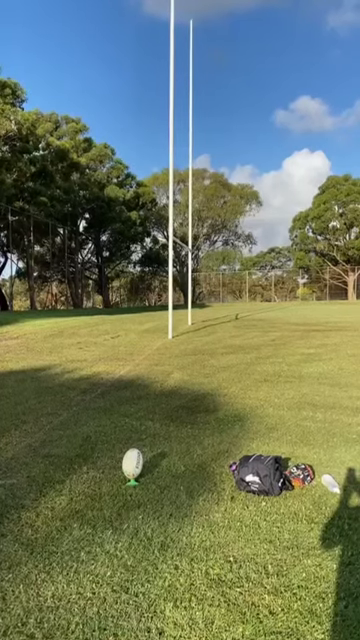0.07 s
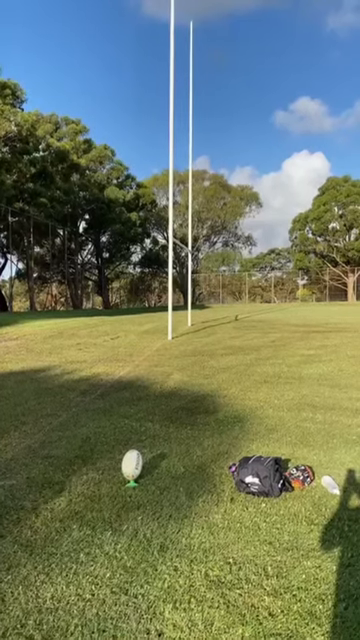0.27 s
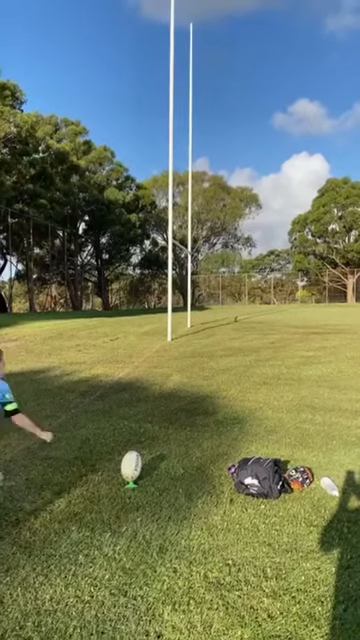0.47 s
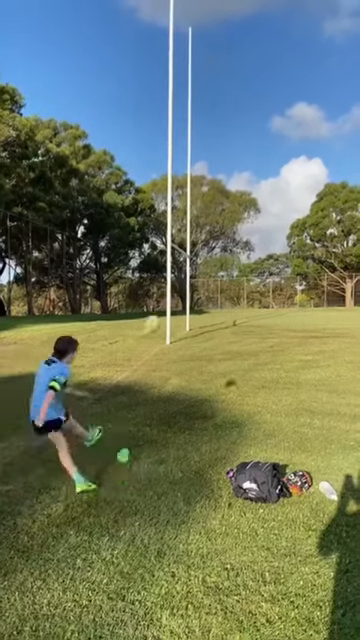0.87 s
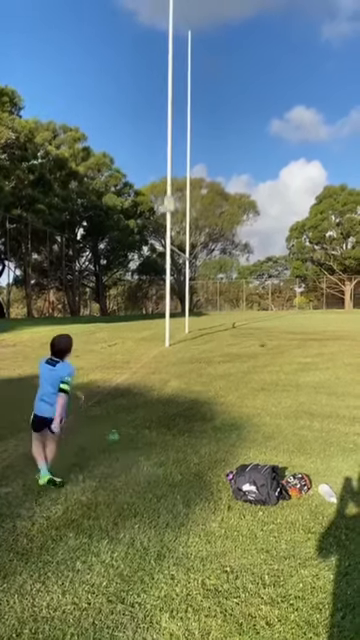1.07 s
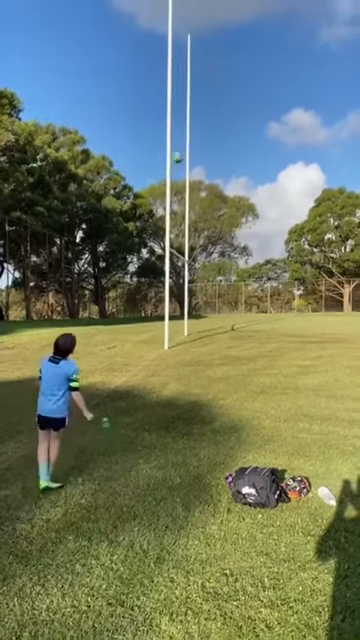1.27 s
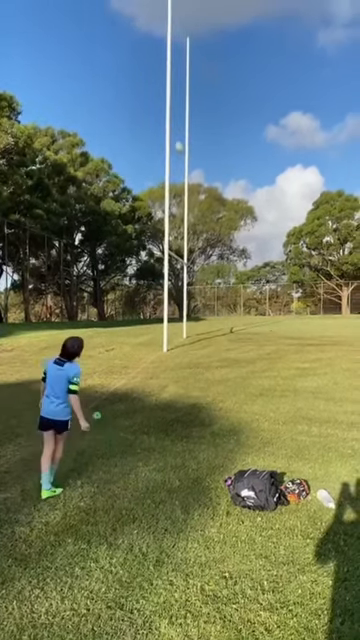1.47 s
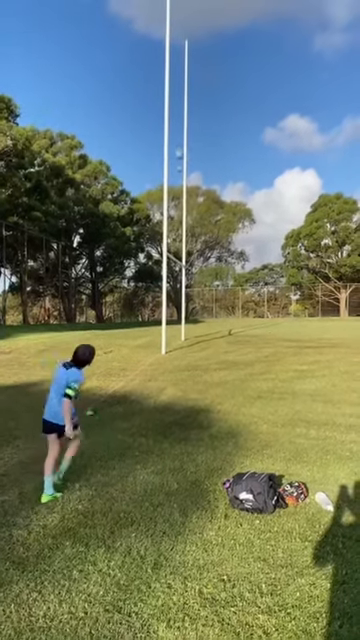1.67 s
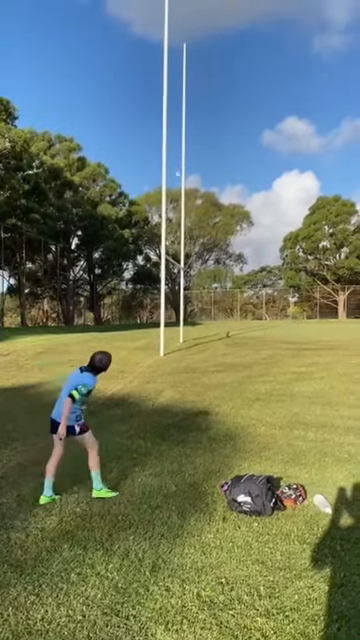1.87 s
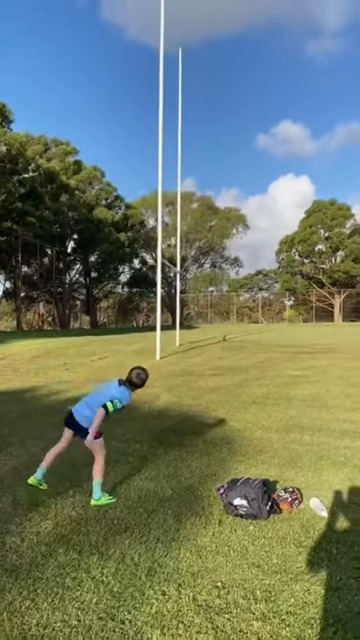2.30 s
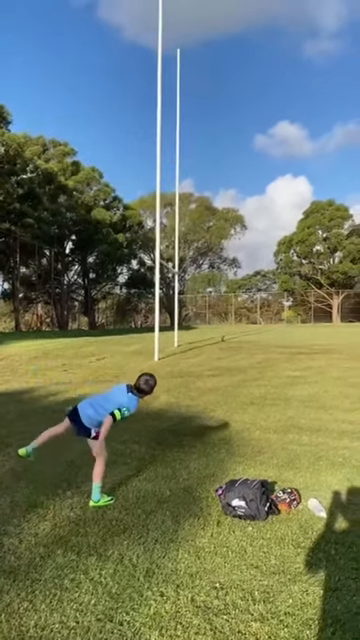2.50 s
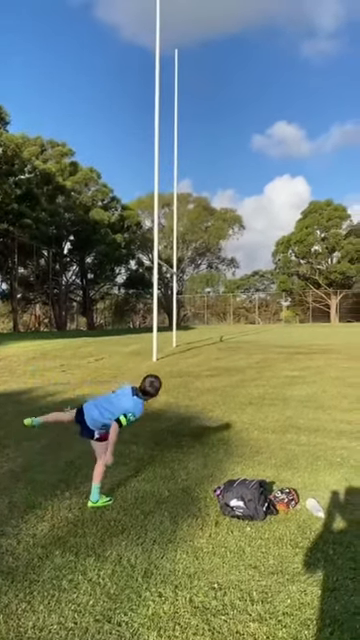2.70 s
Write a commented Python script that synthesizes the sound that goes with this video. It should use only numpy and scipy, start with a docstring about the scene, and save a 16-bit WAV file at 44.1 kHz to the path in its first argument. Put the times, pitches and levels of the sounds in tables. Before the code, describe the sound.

One sharp kick of a rugby ball follows a few faint steps on grass. Gusts keep buffeting the microphone over a faint wash of distant trees, and clothes rustle softly near the end.

```python
"""A rugby ball is kicked off a tee on an open grass field, a few metres away.
From the start, gusts buffet the microphone over a faint wash of distant trees, and boots brush the
grass in the run-up. At 0.7 s the boot skims the turf and slaps the ball; the impact thumps and sets
the enclosed air ringing briefly as the ball leaves the tee. The wind blows on, with a few more
steps and, near 2.5 s, a rustle of clothes."""
import sys
import numpy as np
from scipy import signal
from scipy.fft import rfft, irfft, next_fast_len
from scipy.io import wavfile
from scipy.ndimage import uniform_filter1d, map_coordinates

SR = 44100
rng = np.random.default_rng(int(sys.argv[2]) if len(sys.argv) > 2 else 0)


def waveform_to_disk(signal):
    """Save audio, clipped to [-1, 1], as 16-bit WAV at the path in sys.argv[1]."""
    frames = np.transpose(np.atleast_2d(signal))
    scaled = np.clip(frames, -1, 1) * 32767
    samples = np.round(scaled).astype(np.int16)
    wavfile.write(sys.argv[1], SR, samples)


N = 125685

# Noise spectra of the trees, the wind and the kicker. Each row: frequency in Hz, relative density in dB.
TREE_SPECTRUM = [(290, -2), (500, -11), (650, 1.5), (900, 1), (1300, -0.5), (1650, -5), (2100, -8.5),
                 (2700, -16), (3500, -19), (4300, -22.5), (5300, -24), (6500, -34), (8000, -36.5),
                 (10000, -37), (13000, -41.5)]
RUMBLE_SPECTRUM = [(20, -44.5), (30, -38), (38, -15), (50, -8.5), (66, 0), (95, -1.5), (125, -4),
                   (165, -8.5), (220, -15.5), (330, -34), (700, -88.5)]
BUFFET_SPECTRUM = [(70, -46), (140, -2), (200, -2), (270, -7), (420, -15), (800, -36), (2000, -85)]
EDDY_EDGE_SPECTRUM = [(300, -12), (600, 10), (950, 3), (1350, -11), (1900, -23.5), (4000, -46.5)]
GRASS_SPECTRUM = [(500, -19), (2000, -30), (4000, 4.5), (5600, 3), (7300, -6), (10000, 0.5), (13000, -5.5)]
CLOTH_SPECTRUM = [(600, -13), (2000, 16), (3000, 11.5), (4500, 7), (5800, 2), (7500, -26), (10500, -8),
                  (13000, -28)]
TURF_SPECTRUM = [(200, 4), (700, 6.5), (1450, 9.5), (2200, -4.5), (4000, -7), (7000, -8.5), (10500, -8),
                 (13000, -18)]
STUD_SPECTRUM = [(400, -30), (850, -6), (1100, -7.5), (1420, 0), (1800, -33), (4000, -36)]
# Likeness of the tree wash in the two channels. Each row: frequency in Hz, left-right correlation.
TREE_COHERENCE = [(500, 0.67), (1200, 0.6), (2500, 0.31), (5000, 0.28), (10000, 0.26)]
# Strength of the gusts and of the deep rumble. Each row: time in seconds, relative level in dB.
GUST_LEVELS = [(0.0, -64), (0.058, -45), (0.11, -52.5), (0.128, -36), (0.192, -63.5), (0.246, -25.5),
               (0.266, -40), (0.312, -32), (0.44, -27), (0.504, -55), (0.532, -30), (0.576, -33),
               (0.6, -70), (0.65, -33), (0.668, -39.5), (0.7, -37.5), (0.76, -43.5), (0.81, -31.5),
               (0.88, -58), (0.91, -36), (0.98, -38), (0.99, -28.5), (1.04, -33.5), (1.07, -34),
               (1.08, -40), (1.11, -40), (1.13, -55), (1.19, -40), (1.22, -63), (1.26, -58), (1.28, -32.5),
               (1.33, -38.5), (1.47, -27), (1.5, -35.5), (1.51, -25), (1.59, -34.5), (1.61, -28),
               (1.65, -35.5), (1.66, -29), (1.67, -51.5), (1.68, -28.5), (1.7, -35), (1.81, -28),
               (1.82, -34), (1.87, -29), (1.92, -28.5), (1.95, -50.5), (1.97, -27.5), (2.02, -39.5),
               (2.07, -27), (2.09, -45), (2.14, -27.5), (2.16, -59), (2.18, -25.5), (2.24, -38.5),
               (2.3, -32), (2.33, -34.5), (2.38, -30), (2.45, -34), (2.47, -67), (2.53, -47), (2.58, -51.5),
               (2.6, -35), (2.63, -47.5), (2.66, -39.5), (2.68, -47.5), (2.73, -53), (2.85, -47)]
RUMBLE_LEVELS = [(0.0, -45), (0.032, -36), (0.056, -47.5), (0.172, -39.5), (0.198, -47.5), (0.318, -28.5),
                 (0.586, -32), (0.618, -49), (0.636, -28), (0.7, -29.5), (0.76, -30), (0.81, -29.5),
                 (0.88, -47), (0.91, -27.5), (1.0, -28), (1.12, -31.5), (1.14, -26.5), (1.22, -37.5),
                 (1.25, -48), (1.29, -39), (1.59, -26.5), (1.67, -25), (1.7, -35.5), (1.79, -28),
                 (1.82, -31.5), (1.89, -22.5), (1.96, -31.5), (2.06, -24.5), (2.12, -35), (2.43, -27.5),
                 (2.53, -52), (2.61, -31), (2.65, -60), (2.67, -34), (2.76, -50), (2.79, -35), (2.81, -50),
                 (2.85, -31)]
# Large eddies. Each row: start in seconds, level in dB, starting pitch in Hz, decay time in seconds.
LARGE_EDDIES = [(0.238, -17.5, 426, 0.0034), (0.33, -18.5, 480, 0.0048), (0.343, -17, 380, 0.0068),
                (.407, -15.5, 596, 0.0043), (0.419, -20, 534, 0.0027), (0.438, -17, 655, 0.0027),
                (.534, -17, 485, 0.0036), (.646, -18, 510, 0.0034), (.990, -18.5, 480, 0.0058),
                (1.020, -19.5, 500, 0.0061), (1.066, -16.5, 536, 0.0054), (1.354, -24, 622, 0.0084),
                (1.426, -17, 750, 0.0042), (1.455, -18, 910, 0.0025), (1.469, -15.5, 700, 0.0039),
                (1.511, -28, 620, .006), (1.527, -16.5, 600, 0.0059), (1.548, -15, 730, 0.0028),
                (1.595, -18, 560, 0.0062), (1.611, -17.5, 684, 0.0066), (1.625, -14.5, 620, .005),
                (1.659, -19, 880, .004), (1.773, -19.5, 457, 0.013), (1.799, -11.5, 730, 0.002),
                (1.847, -25.5, 460, 0.0092), (1.867, -22.5, 680, 0.0018), (1.883, -13.5, 494, 0.0028),
                (1.896, -14, 520, 0.0046), (1.966, -18, 343, 0.017), (2.029, -21, 460, .005),
                (2.047, -17, 398, .007), (2.072, -14.5, 530, 0.0044), (2.21, -18, 604, 0.0041),
                (2.232, -16.5, 654, 0.0018), (2.287, -18.5, 470, 0.0042), (2.302, -16, 640, 0.0035),
                (2.334, -24.5, 516, 0.0059), (2.5961, -17, 650, 0.004), (2.602, -22, 212, 0.008),
                (2.6579, -23.5, 588, 0.0057)]
# Rubbing of grass, clothes and studs. Each row: centre in seconds, level in dB, half-width in seconds.
GRASS_STEPS = [(.18, -62, 0.022), (.27, -61, 0.029), (.48, -63, 0.024), (.627, -58, 0.019),
               (.82, -62.5, 0.03), (.96, -59.5, 0.081), (1.25, -72, 0.037), (1.84, -64.5, 0.027),
               (2.06, -75, .03), (2.49, -69, 0.028)]
CLOTH_RUSTLES = [(2.475, -52, 0.012), (2.52, -60, 0.028), (2.63, -60.5, 0.073)]
STUD_SCUFFS = [(.7095, -29.5, 0.0023), (.714, -42, .0015)]
# Modes of the air in the ball. Each row: frequency in Hz, relative level in dB, T60 in seconds.
BALL_MODES = [(800, -10, 0.033), (888, 0.5, 0.028), (1044, 1, 0.023), (1260, 0, 0.023), (1440, 0, 0.029),
              (2010, -8, 0.02), (2670, -22, 0.041), (3560, -35, 0.041), (3750, -25, 0.05)]
# The boot meets the ball, then the ball snaps off the tee. Each row: start in seconds, slap level in dB,
# slap peak in Hz, thump delay in seconds, thump level in dB, thump pitch in Hz, its fall in Hz per
# second, ring level in dB, push level in dB, push pitch in Hz.
BALL_CONTACTS = [(0.7251, -19.5, 3340, 0.00297, -13, 870, 20000, -20.5, -16.5, 181),
                 (0.7356, -25, 5830, 0.0039, -15, 510, 90000, -16.5, -27, 161)]
# Stereo width of the microphone pair. Each row: frequency in Hz, side gain in dB.
SIDE_GAINS = [(300, 8), (1150, -3.5), (1400, -3), (1750, -10), (2100, -5.5), (2450, 5.5), (3000, 6.5),
              (3900, -0.5), (7000, 2), (13000, -8.5)]

STRONG_GUST_DB = -32  # reference strength for the small eddies
EDDY_LAG_S = 0.000091  # the left port hears an eddy later


def amp(db):
    """Amplitude ratio: a factor of ten for every 20 dB."""
    return 10 ** (np.asarray(db) / 20)


def unit(x):
    """Normalisation to rms 1."""
    return x / np.sqrt(np.mean(x ** 2) + 1e-20)


def along(points, hz):
    """Interpolation of (Hz, value) points on a logarithmic frequency axis."""
    freqs, values = np.transpose(points)
    return np.interp(np.log(hz + 1), np.log(freqs + 1), values)


def clock():
    """Sample times in seconds."""
    return np.arange(N) / SR


def since(start):
    """Seconds elapsed since start, zero before it."""
    return np.maximum(clock() - start, 0)


def wobble(rate):
    """Random modulation: a spline through rate Gaussian knots a second."""
    return map_coordinates(rng.standard_normal(4000), [clock() * rate], mode="mirror")


def filtered(x, response):
    """Linear filtering: the spectrum of x is multiplied by response(hz)."""
    size = next_fast_len(N + SR // 2)
    return irfft(rfft(x, size) * response(np.fft.rfftfreq(size, 1 / SR)), size)[..., :N]


def noise(spectrum, coherence):
    """Partly coherent stereo noise of rms 1; coherence is a number or (Hz, value) points."""
    def mid_side_gains(hz):
        correlation = along(coherence, hz) if np.ndim(coherence) else np.full_like(hz, coherence)
        angle = np.arccos(np.clip(correlation, -1, 0.999)) / 2
        return amp(along(spectrum, hz)) * [np.cos(angle), np.sin(angle)]
    mid, side = filtered(rng.standard_normal((2, N)), mid_side_gains)
    return unit(np.array([mid + side, mid - side]))


def steadied(x, span_s):
    """Division by the running rms evens out the chance swells of noise."""
    power = uniform_filter1d(np.mean(x ** 2, 0), int(span_s * SR))
    return x / np.sqrt(np.abs(power) + 1e-6)


def swells(rows):
    """A sum of Gaussian envelopes, one for each row."""
    return sum(amp(db) * np.exp(-((clock() - centre) / width) ** 2 / 2) for centre, db, width in rows)


def distant_trees():
    """Many far sources add incoherently to a nearly steady wash with little bass."""
    wash = filtered(noise(TREE_SPECTRUM, TREE_COHERENCE), lambda hz: hz ** 2 / (hz ** 2 + 330 ** 2))
    return amp(-47.5 + 0.24 * wobble(15)) * unit(wash)


def eddy(t, hz, fade_s, rise_s=0.0008, glide_s=0.0046, low_hz=132):
    """A passing vortex gives a damped pressure pop whose pitch glides from hz towards low_hz."""
    cycles = low_hz * t + (hz - low_hz) * glide_s * (1 - np.exp(-t / glide_s))
    return (1 - np.exp(-t / rise_s)) * np.exp(-t / fade_s) * np.sin(2 * np.pi * cycles)


def small_eddies(gust_db, per_second=120, centre_hz=521, count=600):
    """Turbulence sputters as an irregular pulse train, higher in pitch in stronger gusts; rms 1."""
    jitter, size, pitch, sign = rng.standard_normal((count, 4)).T[..., None]
    start_s = (np.arange(count)[:, None] + 0.4505 * jitter) / per_second
    onsets = np.clip(start_s * SR, 0, N).astype(int)
    octaves = 0.4 * np.tanh(pitch) + 0.0434 * (gust_db.take(onsets, mode="clip") - STRONG_GUST_DB)
    offsets = np.arange(SR // 20)
    pops = np.sign(sign) * amp(1.5 * size) * eddy(offsets / SR, centre_hz * 2 ** octaves, fade_s=0.0028)
    train = np.bincount((onsets + offsets).ravel(), pops.ravel(), N)[:N]
    lags = np.array([[EDDY_LAG_S], [0]])
    return unit(filtered(train, lambda hz: np.exp(-2j * np.pi * hz * lags)))


def wind():
    """Turbulent pressure on the microphone: rumble, buffeting and a sputter that outgrows the gust."""
    gust_db = np.interp(clock(), *np.transpose(GUST_LEVELS))
    rumble_db = np.interp(clock(), *np.transpose(RUMBLE_LEVELS))
    rumble = amp(rumble_db + 1) * steadied(noise(RUMBLE_SPECTRUM, coherence=0.99), span_s=0.05)
    buffet = amp(gust_db - 1.5) * steadied(noise(BUFFET_SPECTRUM, coherence=0.99), span_s=0.024)
    sputter_db = -36.5 + 1.11 * (gust_db - STRONG_GUST_DB)
    return rumble + buffet + amp(sputter_db) * small_eddies(gust_db)


def large_eddies(crack_rise_s=0.0013):
    """Single vortices strike the microphone as pressure pops, each with a brief crack at its edge."""
    pops, edges = np.zeros((2, N)), np.zeros(N)
    for start, db, hz, fade_s in LARGE_EDDIES:
        left_age, age = since(start + EDDY_LAG_S), since(start)
        pops += amp(db) * eddy(np.array([left_age, age]), hz, fade_s)
        edges += amp(db) * age / crack_rise_s * np.exp(1 - age / crack_rise_s)
    crack = steadied(noise(EDDY_EDGE_SPECTRUM, coherence=0.93), span_s=0.00343)
    return pops + amp(-18) * edges * crack


def rubbing(strokes, spectrum, grain_rate):
    """Friction on grass or cloth gives swells of noise, made grainy by amplitude modulation."""
    return swells(strokes) * unit(noise(spectrum, coherence=0.45) * amp(2.1 * wobble(grain_rate)))


def field_scatter(x, t60=0.36):
    """Scattering from ground and trees: convolution with an exponentially decaying noise."""
    tail = noise([(100, -4), (900, -17), (3000, -11), (12000, 0)], coherence=0.4)
    tail *= amp(-60 * clock() / t60)
    return signal.fftconvolve(x, tail / np.linalg.norm(tail[0]), axes=1)[:, :N]


def turf_skim(start=0.692, rise_s=0.011, hold_s=0.046, t60=0.04):
    """Sliding friction: the boot skims the turf into the ball, and its studs scuff."""
    rise = 1 - np.exp(-(since(start) / rise_s) ** 2)
    envelope = rise * amp(-32.5 - 60 * since(start + hold_s) / t60)
    turf = noise(TURF_SPECTRUM, coherence=0.5) * amp(0.92 * wobble(500))
    studs = steadied(noise(STUD_SPECTRUM, coherence=0.95), span_s=0.004)
    return envelope * turf + swells(STUD_SCUFFS) * studs


def skin_slap(age, hz, t60=0.012):
    """Impact on the ball's skin radiates a fast-decaying band of noise that peaks at hz."""
    spectrum = [(hz / 4, -16), (hz * 0.67, -7), (hz, 0), (hz * 1.13, -8), (hz * 2, -16)]
    return (age > 0) * amp(-60 * age / t60) * noise(spectrum, coherence=0.78)


def thump(centre_s, hz, fall_hz_per_s, width_s=0.0013):
    """The impact's pressure pulse: a falling chirp under a Gaussian envelope."""
    t = clock() - centre_s
    return np.exp(-(t / width_s) ** 2 / 2) * np.cos(2 * np.pi * (hz - fall_hz_per_s * t / 2) * t)


def cavity_ring(age, rise_s=0.0023):
    """Cavity resonance: the air in the ball rings in damped modes, at random levels in each channel."""
    modes = sum(amp(db + rng.normal(0, 3.3, (2, 1)) - 60 * age / t60) * np.sin(2 * np.pi * hz * age)
                for hz, db, t60 in BALL_MODES)
    return modes * (1 - np.exp(-age / rise_s))


def low_push(start, hz, lag_s=0.0024, rise_s=0.0033):
    """A heavily damped pressure swing of a few cycles follows the contact."""
    age = since(start + lag_s)
    return age / rise_s * np.exp(1 - age / rise_s) * np.sin(2 * np.pi * hz * age)


def kick():
    """Impulsive excitation: the boot skims in, then each contact gives a slap, thump, ring and push."""
    sound = turf_skim()
    for contact in BALL_CONTACTS:
        start, slap_db, slap_hz, delay, thump_db, thump_hz, fall, ring_db, push_db, push_hz = contact
        sound += amp(slap_db) * skin_slap(since(start), slap_hz)
        sound += amp(thump_db) * thump(start + delay, thump_hz, fall)
        sound += amp(ring_db) * cavity_ring(since(start))
        sound += amp(push_db) * low_push(start, push_hz)
    return sound


def scene():
    """Superposition of the kick, its faint scatter, the kicker's movements, the wind and the trees."""
    ball = kick()
    scatter = amp(-17) * field_scatter(ball)
    steps = rubbing(GRASS_STEPS, GRASS_SPECTRUM, grain_rate=330)
    clothes = rubbing(CLOTH_RUSTLES, CLOTH_SPECTRUM, grain_rate=90)
    return ball + scatter + steps + clothes + wind() + large_eddies() + distant_trees()


def record(dry, low_cut_hz=6.6, top_hz=13150):
    """Mid-side weighting sets the microphone pair's width by band; a band-pass limits its range."""
    mid = (dry[0] + dry[1]) / 2
    side = filtered((dry[0] - dry[1]) / 2, lambda hz: amp(along(SIDE_GAINS, hz)))
    pair = np.array([mid + side, mid - side])
    return filtered(pair, lambda hz: (hz < top_hz) * hz ** 4 / (hz ** 4 + low_cut_hz ** 4))


dry = scene()
out = record(dry)
waveform_to_disk(out)
```